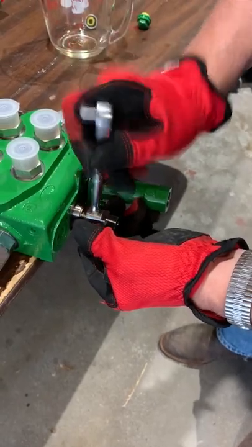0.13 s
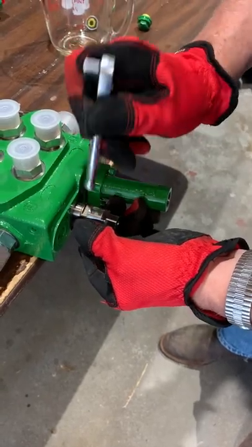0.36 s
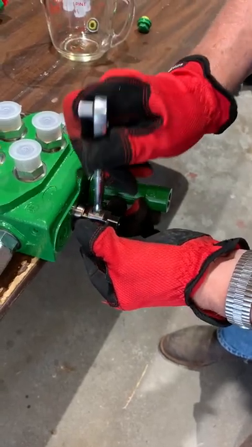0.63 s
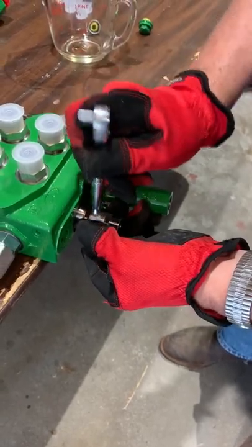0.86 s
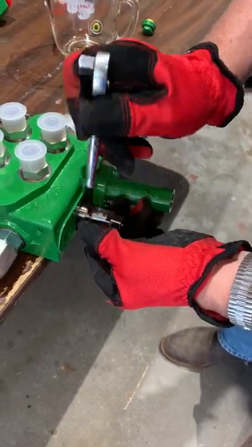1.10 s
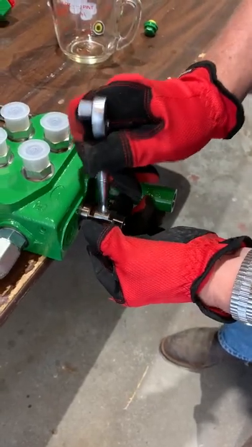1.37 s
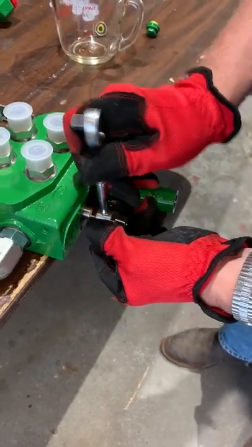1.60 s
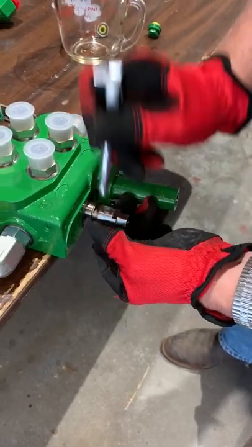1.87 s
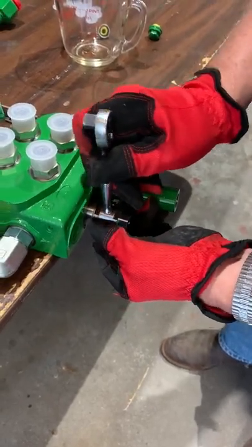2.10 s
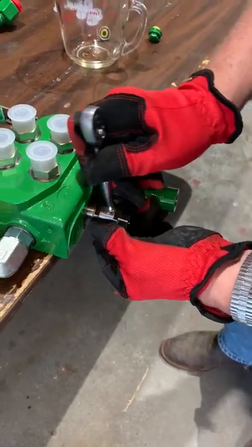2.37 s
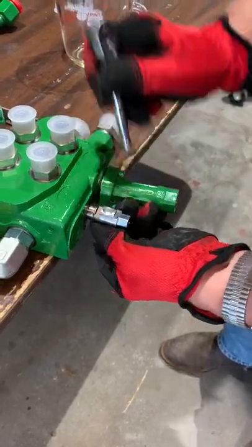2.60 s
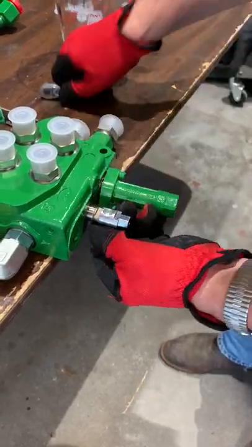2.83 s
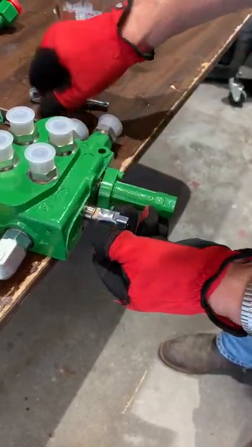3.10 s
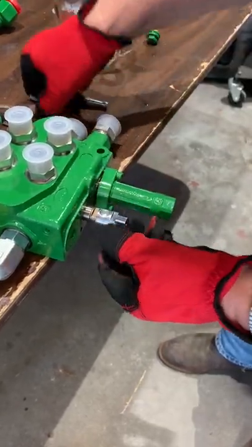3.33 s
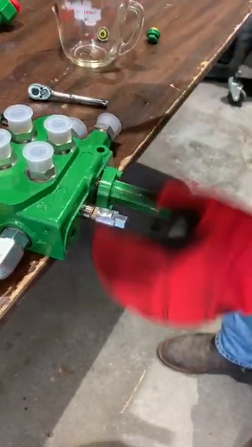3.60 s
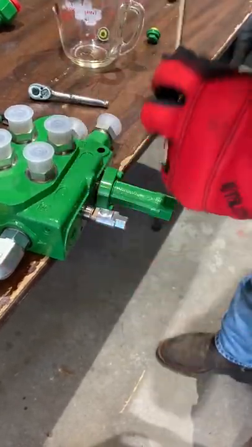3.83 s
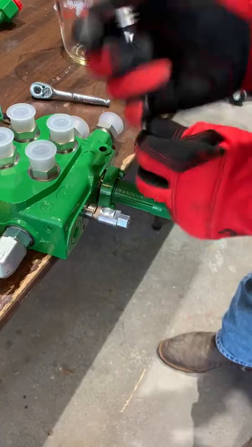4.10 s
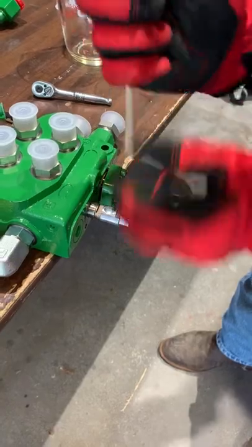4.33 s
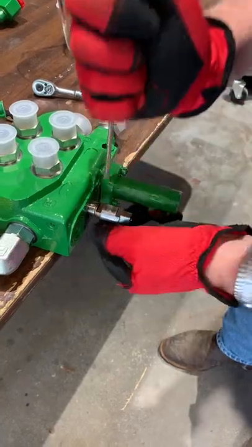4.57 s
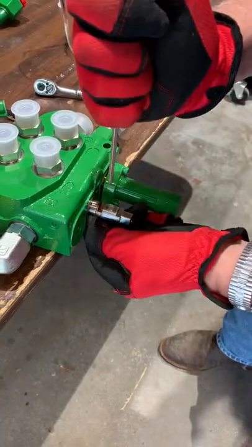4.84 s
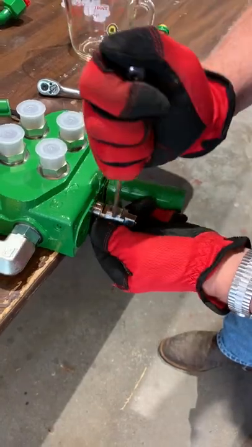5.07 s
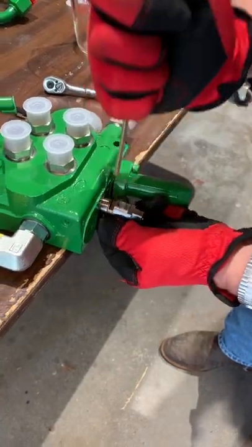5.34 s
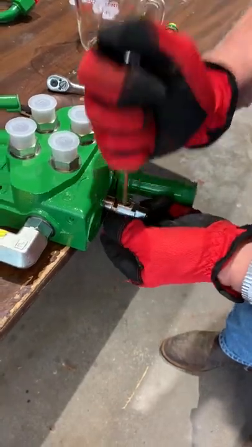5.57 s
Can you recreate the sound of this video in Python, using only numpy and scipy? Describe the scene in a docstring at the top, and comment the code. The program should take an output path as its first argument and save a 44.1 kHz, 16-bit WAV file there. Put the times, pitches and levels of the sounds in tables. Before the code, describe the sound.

A steel ratchet handle raps a small pin seven times, is dropped clattering on a wooden bench, then a punch is struck on the pin.

```python
"""A steel ratchet handle taps a small pin in a valve block clamped to a wooden bench: crackle, pin modes, bench shake.
The bench knocks back against its stand: thumping modes and chattering noise. Gloves rub: dense noise slips.
The ratchet drops on the bench: wood clatter, steel tick and ring. A punch is set on the pin, struck, and grates.
Behind are a hum of filtered noise and the echoes of a hard-walled workshop."""
import sys
import numpy as np
from scipy import signal
from scipy.fft import rfft, irfft, next_fast_len
from scipy.io import wavfile
from scipy.ndimage import uniform_filter1d, minimum_filter1d

SR = 44100
rng = np.random.default_rng(int(sys.argv[2]) if len(sys.argv) > 2 else 0)


def to_linear_factor(level_db):
    """Convert decibel levels (scalar or array-like) to linear amplitude factors."""
    exponent = np.asarray(level_db, float) / 20
    return 10 ** exponent


def materialize(psi):
    """Save the field psi as 16-bit PCM at rate SR to the path in sys.argv[1].

    A 1-D psi becomes a single channel; in a 2-D psi each row is a channel.
    """
    bounded = np.clip(np.atleast_2d(psi).T, -1, 1)
    quanta = np.round(bounded * 32767).astype(np.int16)
    wavfile.write(sys.argv[1], SR, quanta)


N = 251307


def unit_rms(x):
    """Scale to unit rms."""
    return x / np.sqrt(np.mean(x ** 2) + 1e-20)


def in_time(rows):
    """Interpolate the columns of a curve at every sample."""
    s, *columns = np.transpose(rows)
    return [np.interp(np.arange(N) / SR, s, c) for c in columns]


def at_hz(points, hz, axis=1):
    """Interpolate a table column over log frequency."""
    points = np.array(points)
    return np.interp(np.log(hz + 1), np.log(points[:, 0] + 1), points[:, axis])


def colour(x, spectrum):
    """Filter x by a spectrum table, zero phase."""
    size = next_fast_len(N + SR)
    gain = to_linear_factor(at_hz(spectrum, np.fft.rfftfreq(size, 1 / SR)))
    return irfft(rfft(x, size) * gain, size)[..., :N]


def band(x, low_hz, high_hz):
    """Band-pass."""
    return signal.sosfilt(signal.butter(2, [low_hz, high_hz], "band", fs=SR, output="sos"), x)


def clicks(seconds, db):
    """Single-sample blows."""
    out = np.full(N, 1e-18)
    np.add.at(out, np.round(np.asarray(seconds) * SR).astype(int), to_linear_factor(db))
    return out


def dying(x, tau_s):
    """Each click becomes a jump that fades with time constant tau_s."""
    return signal.lfilter([1], [1, -np.exp(-1 / (tau_s * SR))], x)


def strike(seconds, db, modes):
    """Every blow excites each damped resonator with a random strength of its own."""
    out = np.zeros(N)
    luck_db = 2 * rng.standard_normal((len(seconds), len(modes)))
    for k, (hz, level_db, t60_s) in enumerate(modes):
        radius = to_linear_factor(-60 / (t60_s * SR))
        w = 2 * np.pi * hz / SR
        blows = (-1) ** k * clicks(seconds, db + level_db + luck_db[:, k])
        out += signal.lfilter([0, np.sin(w)], [1, -2 * radius * np.cos(w), radius * radius], blows)
    return out


# left-right likeness of diffuse sound: (frequency [Hz], likeness [0..1])
LIKENESS = [(60, 1), (250, 0.96), (600, 0.6), (1500, 0.45), (3000, 0.55), (5000, 0.65), (7000, 0.7),
            (10000, 0.92)]


def diffuse_bands(size):
    """Half-octave bands of stereo noise, mid and side weighted to set the left-right likeness."""
    edges_hz = 25 * 2 ** np.arange(0, 9.7, .5)
    white = rng.standard_normal((2, 2, size))
    for k, (low_hz, high_hz) in enumerate(zip(edges_hz, edges_hz[1:])):
        mid, side = band(white[k % 2], low_hz, high_hz)
        hz = np.sqrt(low_hz * high_hz)
        alike = np.clip(at_hz(LIKENESS, hz), 0, 1)
        yield hz, np.sqrt((1 + alike) / 2) * mid + np.sqrt((1 - alike) / 2) * side * [[1], [-1]]


# hum, fading unevenly as a machine moves off: (time [s], air level [dB], drone level [dB])
HUM_LEVELS = [(0.0, -39.5, -40.5), (0.9, -46.5, -48.5), (1.7, -41.5, -51.5), (2.3, -45, -54),
              (2.75, -44.5, -42.5), (3.3, -48.5, -50.5), (3.6, -45.5, -50.5), (4.9, -48.5, -56.5),
              (5.7, -44.5, -50.5)]
# air spectrum: (frequency [Hz], level [dB])
AIR_SPECTRUM = [(25, -4), (70, -9), (140, -0.5), (300, -8), (550, -10), (800, -24.5), (1100, -23),
                (1600, -11.5), (2300, -30), (3500, -23), (7000, -29), (11000, -52), (16000, -60)]


def hum():
    """Air noise and a narrow-band noise drone follow the level curves, over a steady treble hiss."""
    drone_hz, drone_width_hz = 69.7, 11
    middle_under_low_db, hiss_db = -12, -69
    air_db, drone_db = in_time(HUM_LEVELS)
    low = middle = high = 0
    for hz, noise in diffuse_bands(N):
        noise = noise * to_linear_factor(at_hz(AIR_SPECTRUM, hz))
        low = low + noise * (hz < 800)
        middle = middle + noise * (800 <= hz < 2800)
        high = high + noise * (hz >= 2800)
    drone = band(rng.standard_normal(N), drone_hz - drone_width_hz / 2, drone_hz + drone_width_hz / 2)
    air = unit_rms(low) + to_linear_factor(middle_under_low_db) * unit_rms(middle)
    return to_linear_factor(air_db) * air + to_linear_factor(hiss_db) * unit_rms(high) + to_linear_factor(drone_db) * unit_rms(drone)


# room decay: (frequency [Hz], t60 [s], level [dB])
WALLS = [(39.5, 0.31, 2), (146, 0.27, -5.5), (459, 0.33, -8.5), (1640, 0.36, -8.5), (3950, 0.31, -12.5),
         (8000, 0.33, -17), (15800, 0.026, -7.5)]


def workshop(x):
    """Echoes start after a gap, build up quickly and decay band by band; an earlier tap's tail opens."""
    first_echo_s, build_up_s = 0.00057, 0.0019
    earlier_tap_s, earlier_tap_db = -0.0071, -5
    t = np.arange(SR) / SR
    tail = 0
    for hz, noise in diffuse_bands(SR):
        decay_db = at_hz(WALLS, hz, axis=2) - 60 * t / at_hz(WALLS, hz)
        tail = tail + noise * to_linear_factor(decay_db)
    tail = tail * np.clip((t - first_echo_s) / build_up_s, 0, 1) * to_linear_factor(-19.5)
    out = signal.fftconvolve(x[None], tail, axes=1)[:, :N]
    earlier = colour(tail, CRACK_SPECTRUM)[:, round(-earlier_tap_s * SR):SR]
    out[:, :earlier.shape[1]] += to_linear_factor(earlier_tap_db) * earlier
    return out


def brighten(plain, lifted):
    """Cross over from the plain blow to the lifted one around 5 kHz."""
    return plain + signal.lfilter(*signal.butter(1, 5000, "high", fs=SR), lifted - plain)


# contact spectrum: (frequency [Hz], level [dB])
CRACK_SPECTRUM = [(300, 0), (1000, -12), (1400, -4.5), (2000, -3.5), (3200, 0.5), (4200, -4.5), (5200, -2),
                  (7000, -1.5), (9000, 0), (11500, -5), (14000, -1.5), (17000, -19)]
# pin modes, the close pair beats slowly: (frequency [Hz], level [dB], t60 [s])
PIN_MODES = [(1378, -12, .05), (1510, -9, .04), (3029, 0, .34), (1910, -26, .6), (3034, -9, .34),
             (3100, -9, .04), (2450, -10, .02), (4600, -9, .02), (5400, -9, .02)]
# bench shake modes: (frequency [Hz], level [dB], t60 [s])
SHAKE_MODES = [(46, 3, .09), (72, -2, .08), (125, -3, .06), (240, -5, .05)]


def steel_on_pin(rows, tool_modes, shake_db):
    """Returns the dry-only part (crackle, pin ring) and the part that also echoes (crack, tool, shake)."""
    s, db, pin_db, bright_db, tool_db = np.transpose(rows)
    side_grit = 0.35  # crackle that differs between the sides, relative to the shared part
    grit = rng.choice([-1, 1], N) + side_grit * rng.choice([-1, 1], N) * [[1], [-1]]
    plain = clicks(s, db)
    lifted = clicks(s, db + bright_db)
    crackle = band(brighten(grit * dying(plain, 0.003), grit * dying(lifted, 0.0011)), 1300, 19000)
    straight = to_linear_factor(14.0) * colour(crackle, CRACK_SPECTRUM) + strike(s, db + pin_db, PIN_MODES)
    crack = to_linear_factor(20.5) * colour(brighten(plain, lifted), CRACK_SPECTRUM)
    tool = strike(s, db + tool_db, tool_modes)
    shake = strike(s + 0.0033, db + shake_db, SHAKE_MODES)
    return straight, crack + tool + shake


# handle on pin, with bounces: (time [s], level [dB], pin ring [dB], brightness [dB])
HANDLE_TAPS = [(0.2095, -8.5, -20.5, 4), (0.5378, -9, -11, 5), (0.8933, -5, -19.5, 0.5),
               (1.2492, -6.5, -20, 2.5), (1.269, -37.5, -11, 5), (1.6035, -6.5, -17, 4),
               (1.9773, -7, -17.5, -3), (2.005, -21.5, -9, 16), (2.295, -41.5, -10, -1),
               (2.364, -6, -27, 3)]
# ratchet modes: (frequency [Hz], level [dB], t60 [s])
RATCHET_MODES = [(8350, -2, .03), (8672, 0, .065), (8930, -2, .04)]


def handle_taps():
    """The ratchet handle hits the pin; pin, tool and bench modes ring."""
    tool_ring_db, shake_db = -21, -20
    rows = [row + (tool_ring_db,) for row in HANDLE_TAPS]
    return steel_on_pin(rows, RATCHET_MODES, shake_db)


# bench against its stand: (time [s], level [dB], fade time constant [s], brightness [dB])
KNOCKS = [(0.273, -17, 0.025, -23.5), (0.602, -17.5, 0.02, -23), (0.957, -21, 0.025, -25.5),
          (0.995, -30.5, 0.0069, -12), (1.731, -12.5, 0.014, -21.5), (1.758, -27.5, 0.027, -13),
          (2.102, -16.5, 0.015, -20.5), (2.201, -12, 0.019, -17.5), (2.222, -25, 0.007, -13),
          (2.47, -21, 0.024, -20), (2.812, -37.5, 0.022, -39), (3.254, -32.5, 0.017, -16),
          (3.331, -42.5, 0.042, -4), (4.155, -39.5, 0.028, -18), (5.179, -7.5, 0.0019, -3.5),
          (5.193, -24.5, 0.021, -9), (5.206, -28.5, 0.014, -14.5)]
# bench modes: (frequency [Hz], level [dB], t60 [s])
BENCH_MODES = [(75, -13, .045), (140, -4, .04), (205, -1, .035), (300, -3, .03), (420, -3, .025),
               (600, -4, .02), (900, -5, .015), (1400, -5, .012)]


def bench_knocks():
    """A soft contact thumps the bench modes and chatters for a while, with a rough scuff on top."""
    chatter, scuff = np.zeros(N), np.zeros(N)
    white = rng.standard_normal(N)
    t = np.arange(SR // 8) / SR
    for s, db, fade_s, bright_db in KNOCKS:
        i = round(s * SR)
        swell = (1 - np.exp(-t / 0.0048)) * np.exp(-t / max(fade_s, .001))
        chatter[i:i + len(swell)] += to_linear_factor(db) * swell
        scuff[i:i + len(swell)] += to_linear_factor(db + bright_db) * swell
    s, db = np.transpose(KNOCKS)[:2]
    thump = signal.lfilter([.15], [1, -.85], strike(s + 0.002823, db + 0.5, BENCH_MODES))
    low = to_linear_factor(13.5) * band(white * chatter, 68, 402)
    middle = to_linear_factor(17.5) * band(white * scuff, 340, 2300)
    high = to_linear_factor(4.5) * band(white * scuff, 930, 6800)
    return low + middle + high + thump


# rubs and creases, the shortest are seam snaps: (peak time [s], level [dB], fade time constant [s])
RUBS = [(2.62, -33.5, 0.0016), (2.701, -65.5, .05), (3.223, -63, 0.0046), (3.282, -46, 0.0064),
        (3.356, -70, 0.012), (3.527, -58, .02), (3.594, -59.5, 0.021), (3.814, -55.5, 0.034),
        (3.907, -38.5, 0.0014), (3.968, -50.5, 0.012), (4.048, -53, 0.013), (4.112, -50, 0.023),
        (4.204, -61, 0.057), (4.38, -44.5, 0.013), (4.406, -47, 0.0021), (4.96, -52.5, 0.0051),
        (5.66, -65, 0.033)]
# cloth spectrum: (frequency [Hz], level [dB])
CLOTH_SPECTRUM = [(1470, -47), (2500, -7.5), (5680, -5.5), (8370, -3.5), (9270, -6), (13000, 0.5),
                  (14900, -13.5), (16500, -33)]


def gloves():
    """Dense tiny slips of cloth on cloth; each rub swells and fades."""
    rise_over_fade = 0.3
    t = np.arange(N) / SR
    level = 0
    for s, db, fade_s in RUBS:
        tau_s = np.where(t < s, rise_over_fade * fade_s, fade_s)
        level = level + to_linear_factor(db) * np.exp(-np.abs(t - s) / tau_s)
    slips = rng.standard_normal(N) * to_linear_factor(3.0 * np.minimum(rng.exponential(1, N), 4))
    return level * unit_rms(colour(slips, CLOTH_SPECTRUM))


# landing and settling: (time [s], level [dB], steel tick [dB], steel ring [dB])
DROPS = [(2.895, -31, -26, -47), (2.914, 0, -6, -18), (2.932, -34.5, -20, -35), (2.949, -40, -8, -35),
         (3.024, -8, 3, -16), (3.046, -13.5, -20, -47), (3.063, -26, -12, -39), (3.0794, -7.5, -26.5, -47),
         (3.11, -24, -35, -50), (3.318, -32.5, -25, -44), (3.343, -26.5, -25, -48), (3.394, -27, 3, -38)]
# bench-top modes: (frequency [Hz], level [dB], t60 [s])
BOARD_MODES = [(240, -5, .03), (380, -1, .03), (517, -2, .035), (770, -6, .02), (1093, -7, .015),
               (1405, -5, .018), (1750, -3, .02), (1900, -2, .022), (2150, -4, .015), (2380, -5, .015),
               (3050, -5, .015)]


def dropped_ratchet():
    """Wood answers with a clatter and short middle modes, steel with a tick, a rattle and a high ring."""
    s, db, tick_db, ring_db = np.transpose(DROPS)
    white = rng.standard_normal(N)
    lump_db = 3.0 * np.minimum(rng.exponential(1, N // 40 + 1), 4) - 4.0
    jolts = white * to_linear_factor(lump_db).repeat(40)[:N]  # lumps of about 1 ms
    wood = band(jolts * dying(clicks(s, db), 0.0097), 230, 2130)
    tick = band(white * dying(clicks(s, db + tick_db - 18.0), 0.001), 1000, 14000)
    rattle = band(white * dying(clicks(s, db + tick_db + 7.0), 0.0018), 1470, 5600)
    board = strike(s, db - 4.5, BOARD_MODES)
    ring = strike(s, db + ring_db, RATCHET_MODES)
    return wood + tick + rattle + board + ring


# punch clinks as picked up, is set on the pin, struck, rattles:
# (time [s], level [dB], pin ring [dB], brightness [dB], punch ring [dB])
PUNCH_HITS = [(3.3813, -28.5, -21, -8, -19), (4.371, -44.5, -30, -4, -1.5), (4.6528, -27, -16, -2, -9),
              (4.6645, -36, -26, 1, -0.5), (4.7925, -33.5, -13.5, -12, -2), (5.1319, -8, -19, -2, -16),
              (5.4929, -17.5, -17, -2.5, -22), (5.4977, -26, -22, 14.5, -25), (5.512, -33, -6, 6, -5),
              (5.5882, -44.5, -3, 13, 0), (5.617, -39, -14, 9, -6), (5.653, -38.5, -15, 0, -16)]
# punch modes: (frequency [Hz], level [dB], t60 [s])
PUNCH_MODES = [(1497, -1, .03), (1604, -3, .03), (2100, -8, .02), (6760, -9, .025), (7620, -6, .025),
               (8800, -2, .04), (9300, -4, .03), (10250, -6, .03), (13900, -5, .04)]


def punch():
    """The punch touches and hits the pin; its own modes ring with the pin and the bench."""
    return steel_on_pin(PUNCH_HITS + grating(), PUNCH_MODES, shake_db=-14)


def grating(count=50):
    """The punch grates on the pin after the last blow: random light touches, as punch rows."""
    from_s, to_s = 5.515, 5.69
    level_db, spread_db = -51, 3
    rows = []
    for _ in range(count):
        touch_db = level_db + spread_db * rng.standard_normal()
        rows.append((rng.uniform(from_s, to_s), touch_db, -13.5, -4.0, 1.5))
    return rows


def scene():
    """Everything near the bench, its echoes, and the hum."""
    handle_straight, handle_spreading = handle_taps()
    punch_straight, punch_spreading = punch()
    near = handle_spreading + punch_spreading + bench_knocks() + dropped_ratchet() + gloves()
    return handle_straight + punch_straight + near + workshop(near) + hum()


# port level difference: (frequency [Hz], left minus right [dB])
TILT = [(60, 1), (180, -2), (550, -0.5), (1650, -2), (4970, 0.5), (15000, -1.5)]
# port phase difference: (frequency [Hz], left lead [rad])
LEFT_LEAD = [(0, 0), (1210, -0.3), (1810, 0.7), (2500, 2.3), (2840, 2.1), (3880, 0.9), (4650, 2.8),
             (5340, 3.4), (6290, 5.0), (9560, 7.2), (11100, 8.9), (13000, 9.8), (15300, 12.5),
             (16600, 12.4)]


def microphone_ports(x):
    """Two close ports, the right one mostly late: level and phase differences split evenly between them."""
    size = next_fast_len(N + SR // 10)
    hz = np.fft.rfftfreq(size, 1 / SR)
    half = to_linear_factor(at_hz(TILT, hz) / 2) * np.exp(.5j * np.interp(hz, *np.transpose(LEFT_LEAD)))
    return irfft(rfft(x, size) * [half, 1 / half], size)[:, :N]


def limiter(x):
    """Ducks both sides by the peak excess, holds, then releases linearly in dB."""
    limit_db, hold_s, release_db_per_s = -.5, .0115, 6000
    over_db = np.maximum(20 * np.log10(np.abs(x).max(axis=0) + 1e-9) - limit_db, 0)
    hold = round(hold_s * SR)
    held_db = -minimum_filter1d(-over_db, size=hold, origin=(hold - 1) // 2 - 24)  # looks 24 samples ahead
    ramp_db = release_db_per_s * np.arange(N) / SR
    duck_db = np.maximum.accumulate(held_db + ramp_db) - ramp_db
    return x * to_linear_factor(-uniform_filter1d(duck_db, size=25))


def low_pass(x):
    """Removes everything above the highest recorded frequency."""
    return signal.sosfilt(signal.butter(12, 17010, fs=SR, output="sos"), x)


def record(dry):
    """Microphone ports, limiter, steep 17 kHz low-pass and clipping."""
    x = limiter(microphone_ports(dry))
    x = signal.sosfilt(signal.cheby2(10, 60, 17000, fs=SR, output="sos"), x)
    mix = np.clip(x, -1, 1)
    return low_pass(mix)


dry = scene()
out = record(dry)
materialize(out)
```